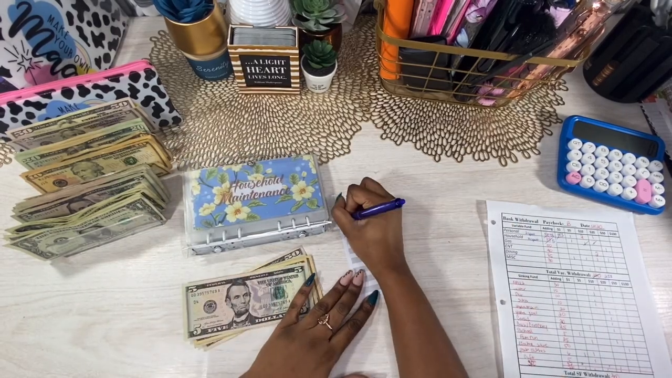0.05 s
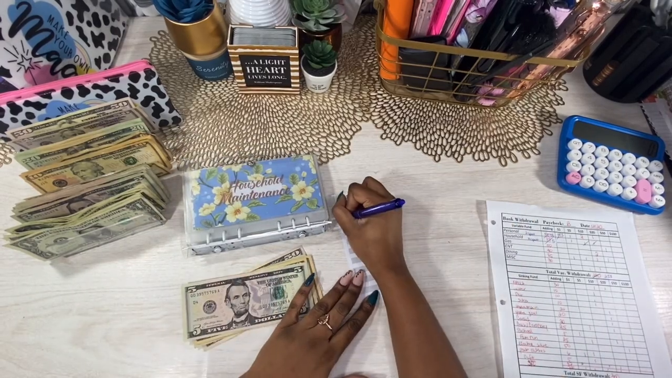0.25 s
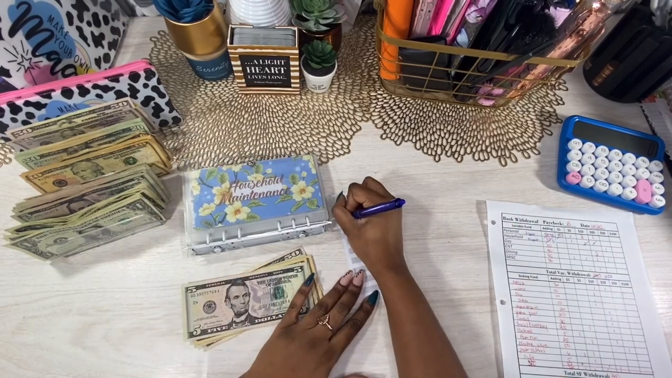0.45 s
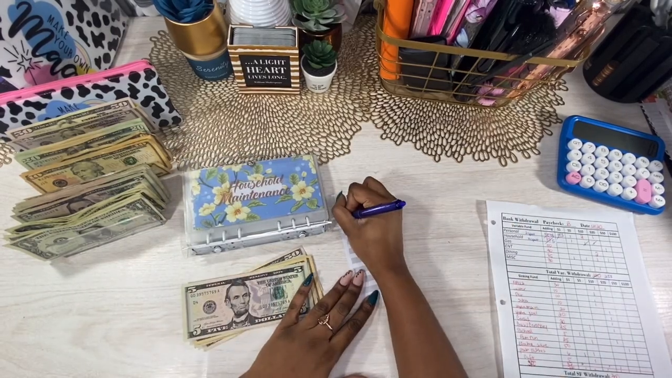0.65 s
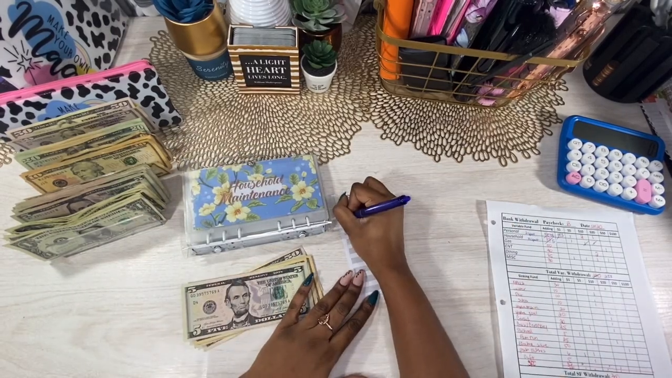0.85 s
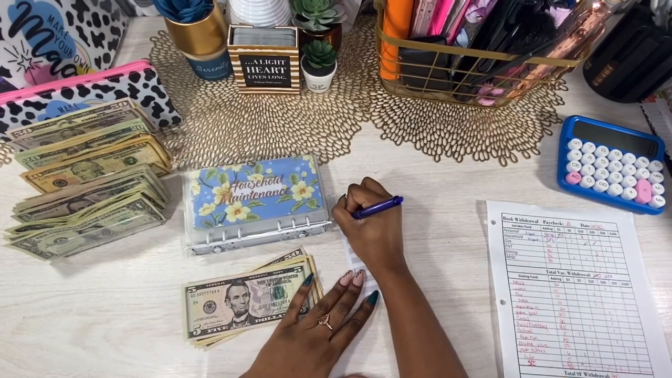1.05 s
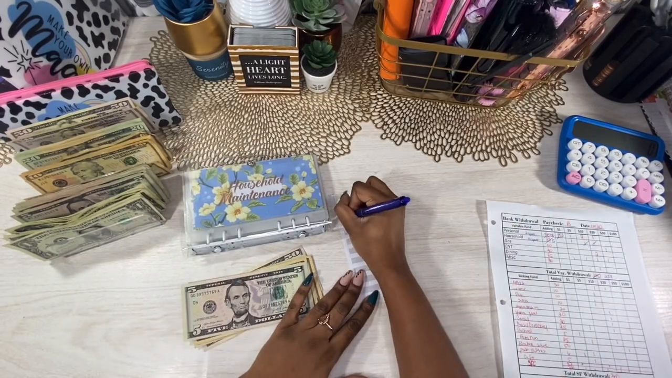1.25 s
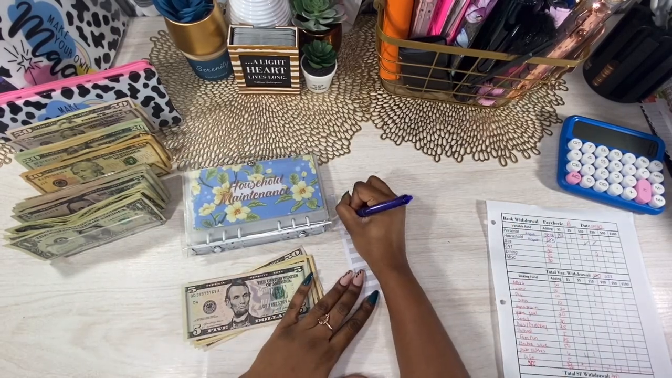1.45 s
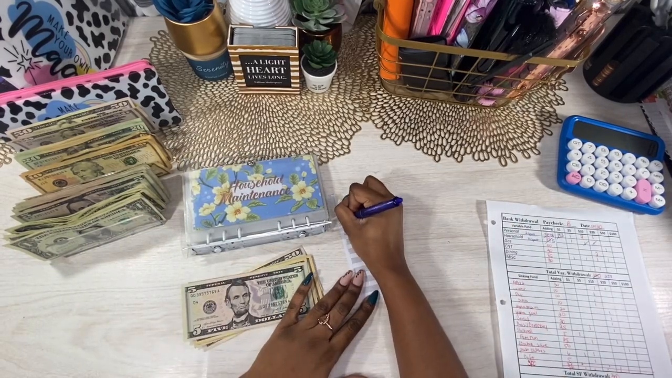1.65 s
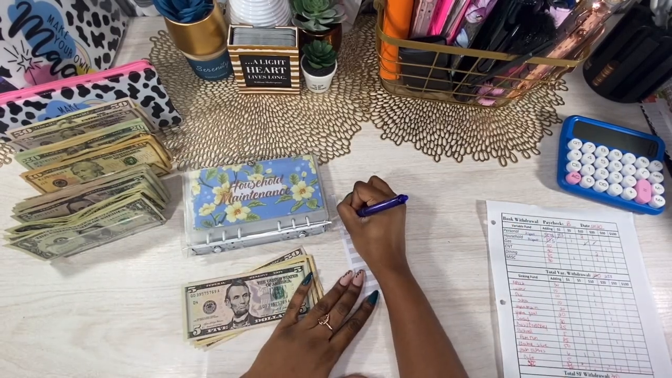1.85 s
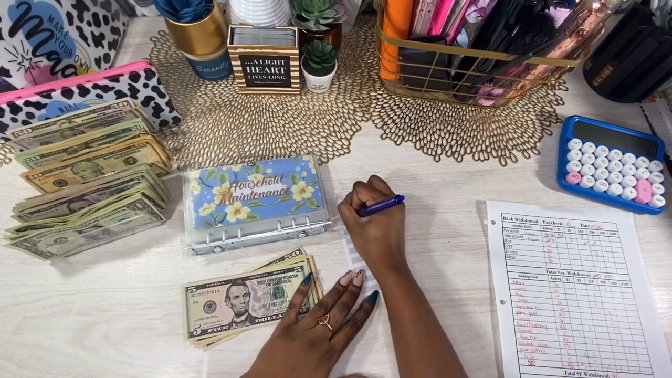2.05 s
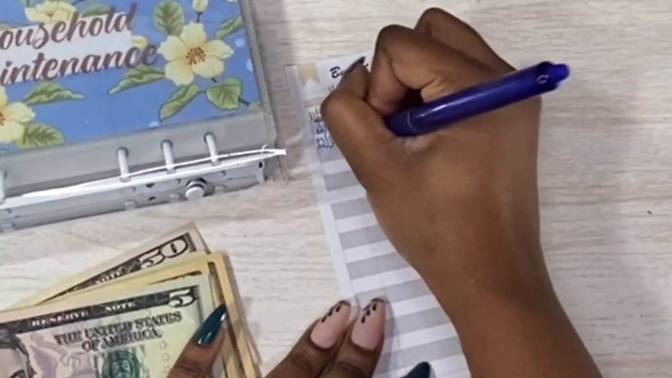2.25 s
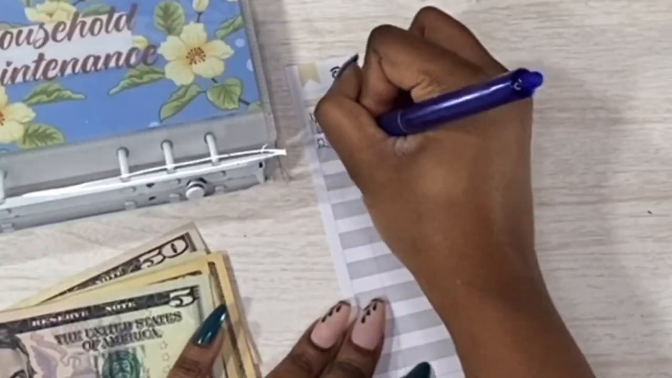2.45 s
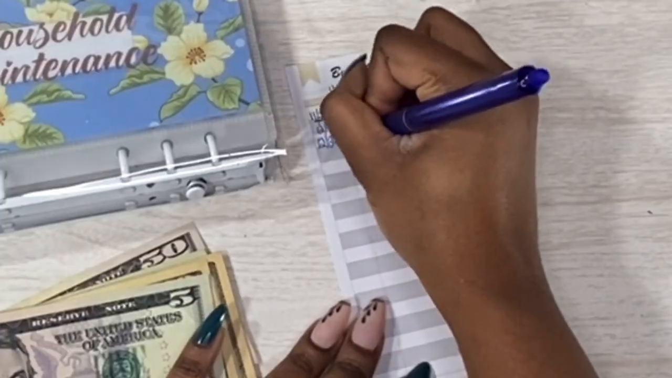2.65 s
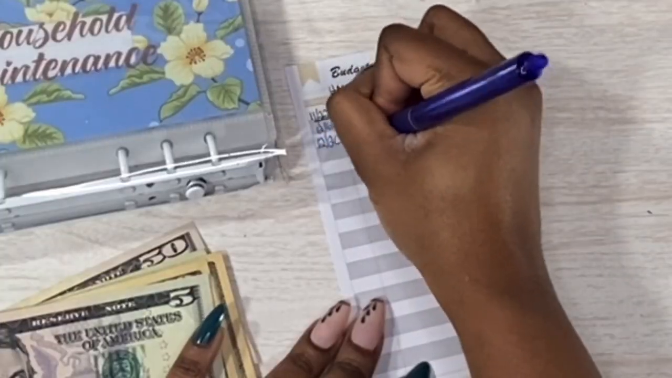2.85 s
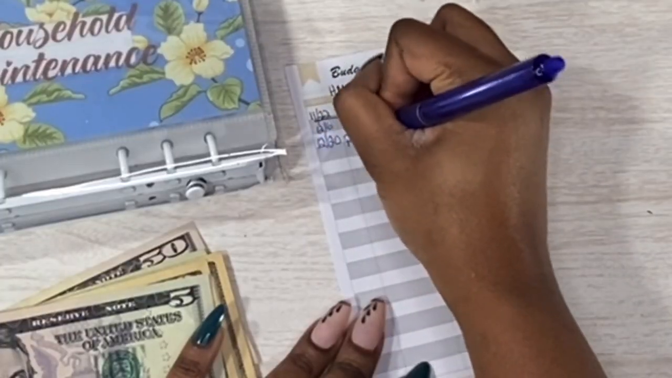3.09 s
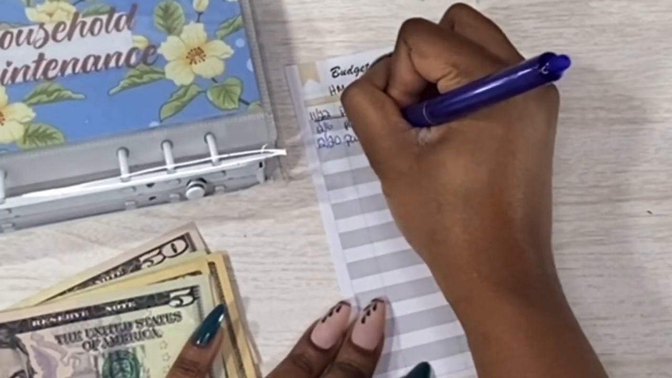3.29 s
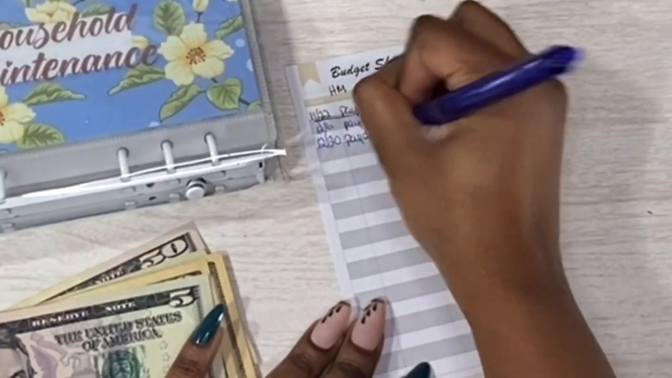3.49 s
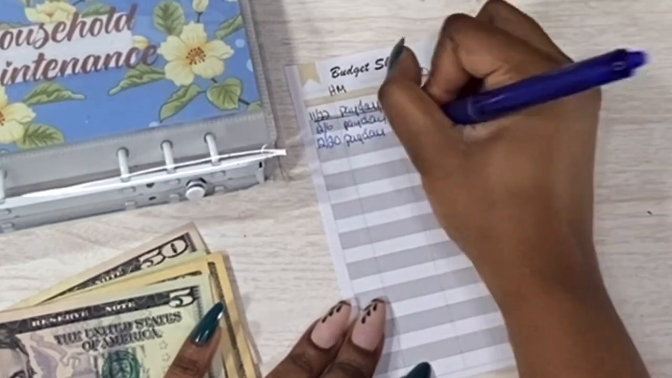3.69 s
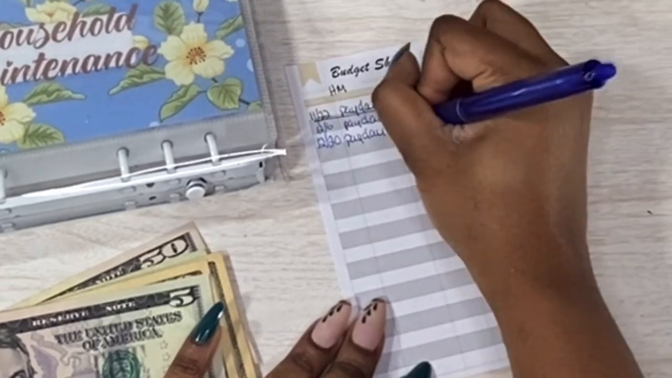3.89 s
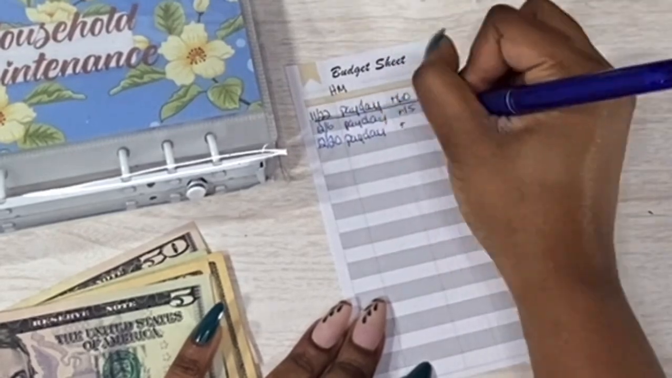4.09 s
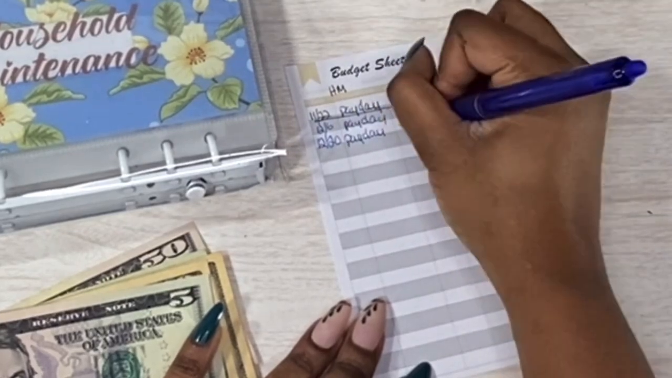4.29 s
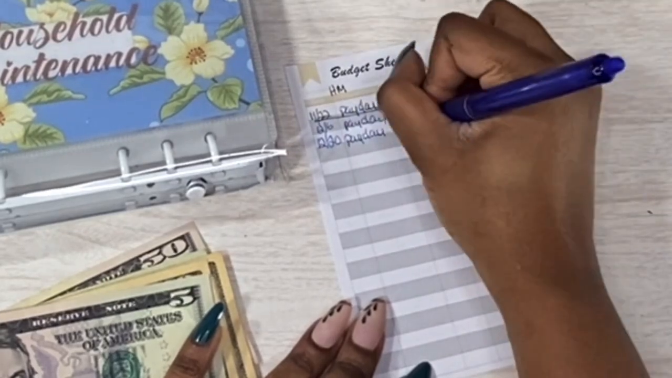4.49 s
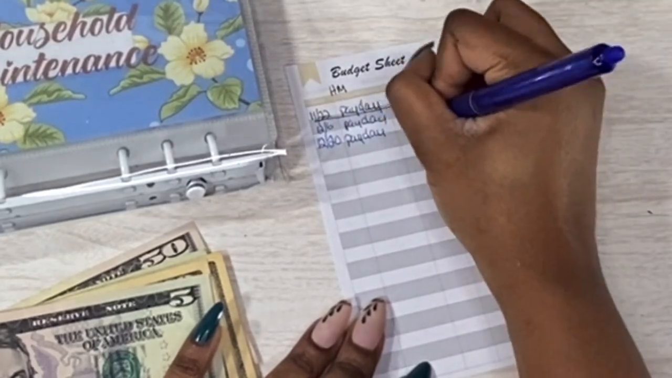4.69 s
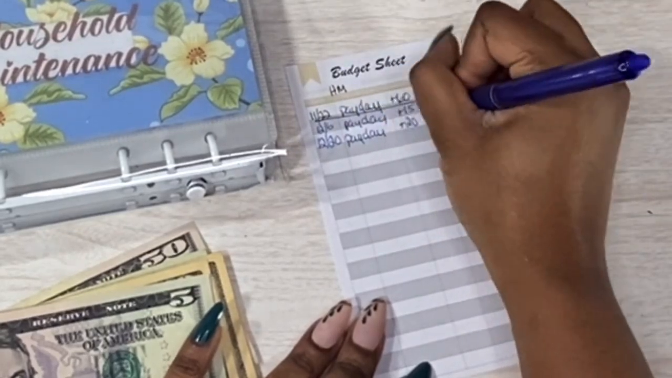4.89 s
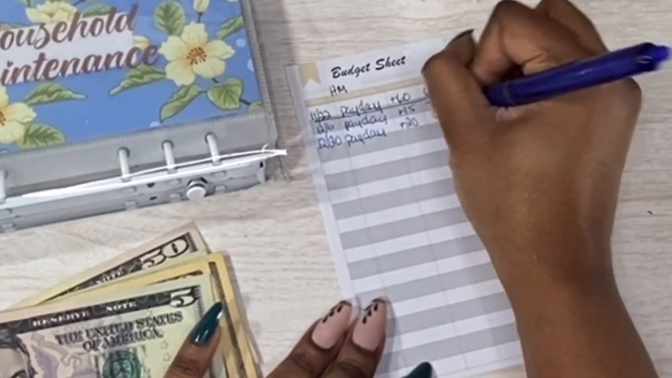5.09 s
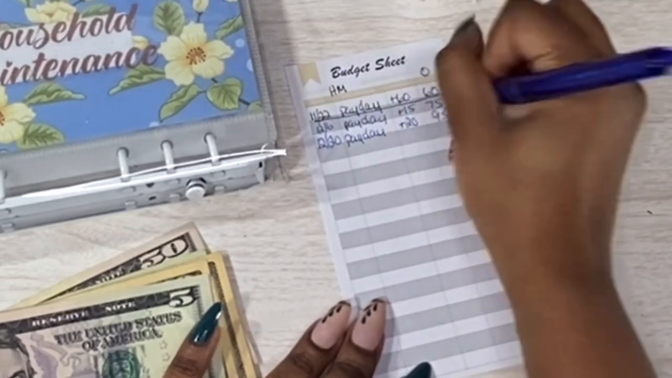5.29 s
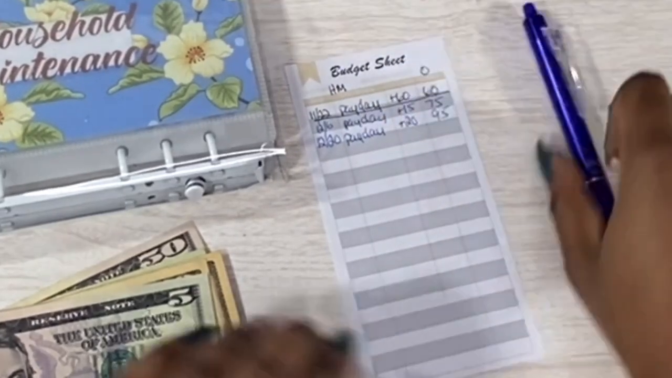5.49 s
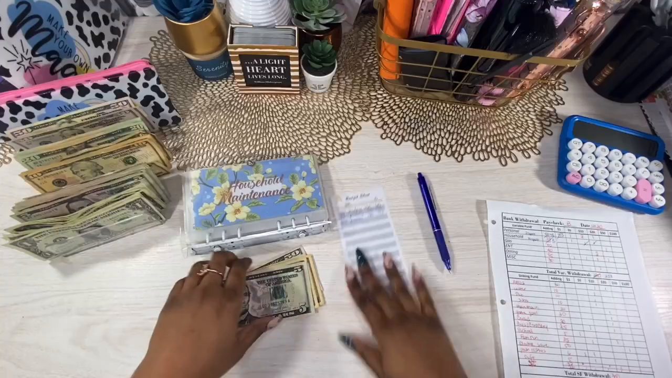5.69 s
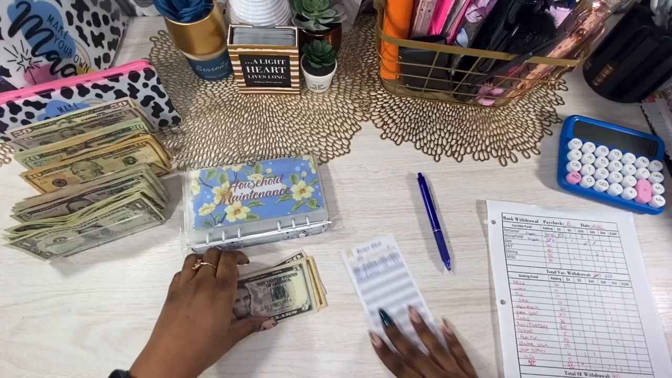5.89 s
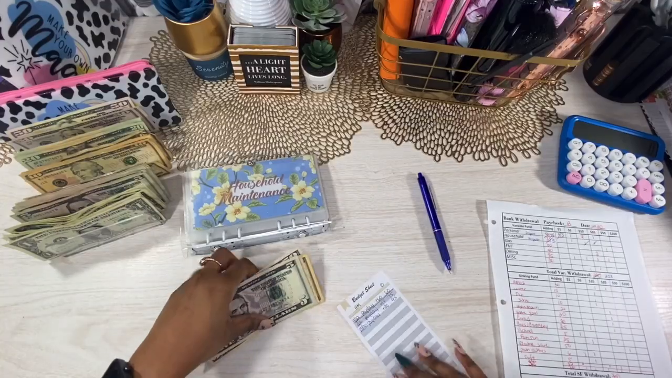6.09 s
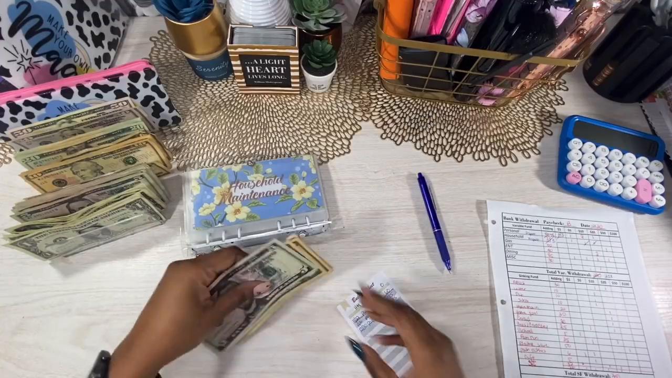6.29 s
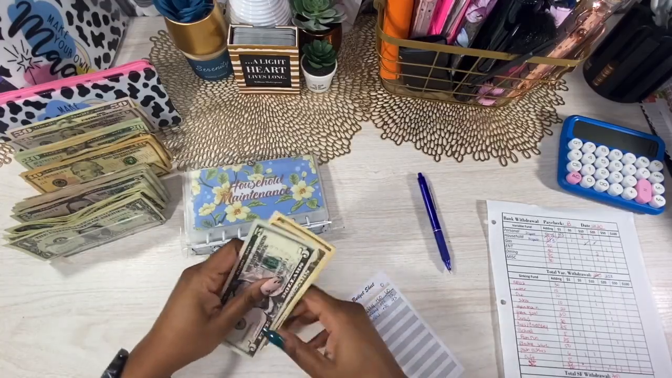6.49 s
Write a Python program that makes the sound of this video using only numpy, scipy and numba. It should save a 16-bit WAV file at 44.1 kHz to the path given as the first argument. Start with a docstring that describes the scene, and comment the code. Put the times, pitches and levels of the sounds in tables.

```python
"""At a hollow table in a quiet room, a ballpoint pen writes short strokes on a slip of paper.
The tip scratches over the paper fibres, taps down and makes the table top hum. The middle
stretch plays at nearly double speed, almost an octave up, and ends as the pen is dropped on
the table; then hands slide paper about. A car passes far outside."""
import sys
import numpy as np
from scipy import signal
from scipy.fft import rfft, irfft
from scipy.io import wavfile
from scipy.ndimage import uniform_filter1d
from numba import njit

SR = 44100
rng = np.random.default_rng(int(sys.argv[2]) if len(sys.argv) > 2 else 0)


def store_pcm(level_fs):
    """Save levels as 16-bit WAV."""
    pcm = np.round(np.clip(level_fs, -1, 1) * 32767).astype(np.int16)
    wavfile.write(sys.argv[1], SR, np.atleast_2d(pcm).T)


N = 288585

FAST_START_S, FAST_END_S, FAST_SPEED = 2.107, 5.555, 1.88
TABLE_LAG_S = .003  # the top starts to swing a moment after the contact
# In every table, dB values are relative and pitches are for normal speed.
# The low notes of the table top: pitch_hz, width_hz, level_db
TABLE_NOTES = [(56, 16, -2.5), (123, 4.37, 3.5), (168, 47, -12), (237, 22, -21.5), (338.3, 8.3, -21)]


def pen_scratch(speed):
    """The ball rolls over paper fibres, which hiss and make the pen and paper ring."""
    # Ringing of the pen barrel and paper under the ball: pitch_hz, width_hz, level_db
    rub_notes = [(260, 60, -6.5), (424, 180, -3), (1556, 170, -1.5), (1870, 370, -1.5)]
    # Broad hiss of the paper grain: pitch_hz, width_hz, level_db
    hiss_bands = [(4180, 1240, 6.5), (7360, 2100, -3), (10400, 1000, -16.5)]
    fibres = grit(spread_db=4, grains_per_s=1200)
    rub = flicker(3.8, .004) * resonate_twice(fibres, rub_notes, speed)
    hiss = flicker(3.1, .0042) * np.diff(resonate(fibres, hiss_bands, speed), prepend=0)
    scratch = rub + hiss
    fast = speed > 1
    scratch /= np.where(fast, np.std(scratch[fast]), np.std(scratch[~fast]))  # same level at both speeds
    return undb(4.5) * scratch_loudness(speed) * scratch


def scratch_loudness(speed):
    """Each stroke or slide rises quickly, holds a moment and is 25 dB down after its length."""
    # Pen strokes, and a hand sliding on the paper just before the pen drops: peak_s, length_s, level_db
    moves = [(0.749, 0.07, -59), (0.788, 0.1, -58.5), (0.97, .03, -70.5), (1.01, 0.12, -63),
             (1.055, 0.059, -70.5), (1.136, 0.053, -62.5), (1.2, 0.13, -77.5), (1.359, 0.11, -56),
             (1.391, 0.091, -58), (1.574, 0.08, -68), (1.661, 0.13, -58.5), (1.761, 0.042, -66.5),
             (1.844, 0.044, -73), (1.976, 0.082, -73.5), (2.088, 0.045, -58), (2.143, 0.14, -71),
             (2.363, 0.054, -59), (2.43, 0.049, -68), (2.478, 0.074, -70.5), (2.581, 0.073, -64),
             (2.679, 0.048, -62), (2.765, 0.065, -56.5), (2.838, .11, -71), (2.98, 0.056, -68.5),
             (3.093, 0.066, -64), (3.218, 0.074, -67), (3.399, 0.12, -73.5), (3.476, 0.17, -65),
             (3.902, 0.049, -68.5), (3.975, .12, -77.5), (4.551, 0.04, -76), (4.68, 0.053, -66.5),
             (4.742, 0.071, -69), (4.958, .05, -72), (5.026, 0.071, -64.5), (5.109, 0.053, -69),
             (5.187, 0.03, -72.5), (5.253, 0.11, -70.5), (5.35, 0.29, -62.5), (5.42, 0.028, -78)]
    t, gain, rise_s = np.arange(N) / SR, 0, .0121
    for peak_s, length_s, level_db in moves:
        age = t - peak_s
        rise = -age * speed[int(peak_s * SR)] / rise_s
        fall = (np.abs(age) / length_s) ** 1.395
        drop_db = 25 * np.minimum(np.where(age < 0, rise, fall), 10)
        gain = gain + undb(level_db - drop_db)
    return gain


def pen_taps(speed):
    """Paper cushions the landing tip: a light tick, a duller knock, and the table answers."""
    # The tip lands or flicks: start_s, tick_db, knock_db
    landings = [(0.747, -56, -67), (0.9115, -26, -43), (1.218, -58, -56), (1.303, -28, -43),
                (1.529, -24, -39.5), (1.85, -62, -67), (1.924, -55, -46.5), (2.1, -53, -50),
                (2.322, -50, -52.5), (2.411, -51, -39.5), (2.552, -64, -43.5), (2.678, -55, -43.5),
                (2.733, -62, -45.5), (2.846, -62, -55), (2.926, -56, -42.5), (3.055, -44, -48.5),
                (3.169, -51, -43.5), (3.353, -39.5, -51.5), (3.875, -58, -48), (3.965, -31.5, -40.5),
                (4.641, -29.5, -38.5), (5.103, -37, -36), (5.248, -23, -37.5)]
    start_s, tick_db, knock_db = np.transpose(landings)
    cushion = signal.butter(1, 2500, fs=SR)
    tick_hits, knock_hits = (
        signal.lfilter(*cushion, clatter(start_s, db, crack_s=.00075, rattle_s=.017, rattle_db=-28.5))
        for db in (tick_db, knock_db))
    tick = barrel_ring(np.diff(tick_hits, prepend=0), speed, damping=2.2)
    knock = barrel_ring(knock_hits, speed, damping=3.8)
    thud = resonate(blows(start_s + TABLE_LAG_S, knock_db, contact_s=.0034), TABLE_NOTES, speed)
    return undb(-20.5) * tick + undb(-17) * knock + undb(22.5) * thud


def pen_drop(speed):
    """The falling pen hits hard: its barrel rings, the contact cracks and the table thuds."""
    # The pen drops and bounces, fingernails touch down: start_s, hit_db, thud_db
    impacts = [(5.4581, -15, -14), (5.51, -3.5, -6.5), (5.533, -20.5, -28), (5.568, -28.5, -42),
               (5.692, -39, -22), (5.766, -40, -64), (6.488, -52, -67)]
    start_s, hit_db, thud_db = np.transpose(impacts)
    barrel_hits = clatter(start_s, hit_db, crack_s=.0018, rattle_s=.018, rattle_db=-17)
    barrel = barrel_ring(barrel_hits, speed, damping=2.6)
    crack = np.diff(clatter(start_s, hit_db, crack_s=.0018, rattle_s=.02, rattle_db=-17), prepend=0)
    thud = resonate(blows(start_s + TABLE_LAG_S, thud_db, contact_s=.00061), TABLE_NOTES, speed)
    return undb(-23.5) * barrel + undb(-16) * crack + undb(23.5) * thud


def barrel_ring(hits, speed, damping):
    """Hits make the pen barrel ring; damping, as from fingers on it, shortens the ring."""
    # Notes of the barrel: pitch_hz, level_db, ring_s (time to fade 60 dB, before damping)
    barrel_notes = [(292, -13.5, 0.16), (418, -8.5, 0.1), (558, -3.5, .12), (770, 2.5, 0.045),
                    (920, -10.5, 0.053), (1052, -13, 0.12), (1270, -3.5, 0.071), (1422, -18, 0.42),
                    (1580, 2.5, 0.018), (1933, 4, 0.037), (2267, -15.5, 0.19), (2985, -9, 0.054),
                    (4230, -20.5, 0.09)]
    sound = 0
    for pitch_hz, level_db, ring_s in barrel_notes:
        width_hz = damping * np.log(1000) / np.pi / ring_s
        sound = sound + undb(level_db) / width_hz * ring(hits, float(pitch_hz), width_hz, speed)
    return sound * SR / (2 * np.pi) / speed


def clatter(start_s, level_db, crack_s, rattle_s, rattle_db):
    """Each blow is a burst of tiny contacts: a quick crack and a slower loose rattle."""
    t = np.arange(SR // 4) / SR
    fade = np.exp(-t / crack_s) + undb(rattle_db) * np.exp(-t / rattle_s)
    burst = fade * (1 - np.exp(-t / .0021))
    hits = blows(start_s, level_db)
    before = np.arange(N) / SR < FAST_END_S
    early = signal.fftconvolve(hits * before, burst)[:N] * before  # cut where the fast stretch ends
    late = signal.fftconvolve(hits * ~before, burst)[:N]
    return (early + late) * grit(spread_db=4, grains_per_s=800)


def table_hum(speed):
    """The table top swings at its low notes while the hand drags on it."""
    drag = grit(spread_db=2.6, grains_per_s=150)
    swing = sum(undb(db) * steady(ring(drag, float(hz), float(width), speed))
                for hz, width, db in TABLE_NOTES)
    return push_loudness(speed) * unit(swing)


def push_loudness(speed):
    """Each push of pen or hand is one short swell of the hum, cut where the speed changes."""
    # Pushes on the table: start_s, peak_db
    pushes = [(0.66, -55.5), (0.742, -36), (0.782, -35), (0.914, -39), (0.95, -46), (1.008, -34),
              (1.07, -44.5), (1.14, -50.5), (1.215, -52), (1.3, -37), (1.345, -34.5), (1.39, -33),
              (1.525, -41.5), (1.585, -48), (1.655, -39), (1.7, -44.5), (1.76, -57), (1.84, -60.5),
              (1.93, -45), (1.99, -46), (2.07, -31.5), (2.108, -43), (2.327, -49.5), (2.366, -45.5),
              (2.415, -42), (2.435, -40), (2.473, -48.5), (2.512, -51), (2.577, -41.5), (2.633, -46),
              (2.682, -43), (2.767, -39.5), (2.811, -41), (2.847, -37), (2.932, -50), (2.982, -46.5),
              (3.082, -42.5), (3.106, -42), (3.175, -50), (3.214, -45.5), (3.246, -50), (3.323, -49),
              (3.407, -51), (3.468, -49.5), (3.492, -45), (3.606, -56), (3.713, -53.5), (3.851, -48.5),
              (3.901, -44.5), (3.971, -44), (4.019, -51), (4.101, -54.5), (4.364, -61), (4.42, -48.5),
              (4.497, -48), (4.517, -48.5), (4.558, -46), (4.604, -50.5), (4.649, -43.5), (4.684, -43),
              (4.742, -45), (4.771, -51.5), (4.883, -49), (4.926, -41.5), (4.967, -40.5), (5.03, -39),
              (5.109, -38), (5.162, -47.5), (5.19, -43), (5.254, -35.5), (5.296, -48), (5.376, -44),
              (5.557, -30), (5.605, -33), (5.702, -30), (5.79, -45), (5.84, -70), (5.9, -57), (6.03, -59),
              (6.15, -48), (6.2, -75.5), (6.37, -73), (6.515, -55.5)]
    start_s, peak_db = np.transpose(pushes)
    rise_s, bend = .02, .95  # a higher bend ends the swell more abruptly
    hit_power, power = blows(start_s, 2 * peak_db), 0  # doubling dB squares the gain
    stretch = np.cumsum(np.diff(speed, prepend=1) != 0)
    for index, rate in enumerate((1, FAST_SPEED, 1)):
        age = np.arange(SR // 2) / SR * rate / rise_s
        swell = age * np.exp((1 - age ** bend) / bend)
        inside = stretch == index
        power = power + signal.fftconvolve(hit_power * inside, swell ** 2 / 2)[:N] * inside
    return np.sqrt(np.abs(power))


def sliding_paper():
    """Sheets buckle in bursts and hiss as they slide."""
    # Loudness of the moving paper: time_s, buckle_db, hiss_db
    moves = [(5.555, -45, -46), (5.585, -49.5, -44.5), (5.677, -59.5, -63.5), (5.759, -67, -51),
             (5.767, -43, -54), (5.817, -60, -54.5), (5.86, -43.5, -54.5), (5.9, -47.5, -53),
             (5.94, -59.5, -55), (6.0, -48, -50), (6.06, -39.5, -59), (6.107, -58.5, -64.5),
             (6.16, -67, -54), (6.3, -70.5, -68.5), (6.478, -75, -76), (6.492, -59, -57.5),
             (6.54, -66, -67.5)]
    # Ringing of the sheet, then its hiss: pitch_hz, width_hz, level_db
    sheet_notes = [(465, 200, -8), (930, 590, 5.5), (1617, 700, -2)]
    hiss_bands = [(2870, 3460, -4.5), (6600, 6900, -6.5), (10970, 1400, -12), (14800, 1400, -17)]
    normal_speed = np.ones(N)
    buckle = unit(resonate_twice(grit(spread_db=1.4, grains_per_s=330), sheet_notes, normal_speed))
    hiss = unit(resonate(grit(spread_db=4.5, grains_per_s=2600), hiss_bands, normal_speed))
    buckle *= curve(moves) * flicker(2.1, .012)
    hiss *= curve(moves, column=2) * flicker(2, .012)
    return buckle + hiss


def reflections(sound, fade_s, low_hz):
    """Nearby objects send the treble back as a short wash of echoes."""
    t = np.arange(SR // 5) / SR
    tail = rng.standard_normal(len(t)) * 10 ** (-3 * t / fade_s) * (1 - np.exp(-t / .00016))
    echoes = signal.fftconvolve(sound, tail / np.linalg.norm(tail))[:N]
    return signal.lfilter(*signal.butter(2, low_hz, "high", fs=SR), echoes)


def distant_car(speed):
    """Tyres roar through the walls during the fast stretch, only loosely alike left and right."""
    # Loudness of the passing car: time_s, level_db
    passing = [(4.0, -87.5), (4.39, -76.5), (4.87, -63.5), (5.1, -70), (5.55, -64)]
    # Tyre roar: pitch_hz, width_hz, level_db
    tyre_bands = [(530, 150, -4), (990, 300, 1.5), (1260, 160, -4.5), (1700, 600, -8.5)]
    fast = speed > 1
    mid, side = (unit(resonate_twice(rng.standard_normal(N), tyre_bands, speed)[fast]) for _ in range(2))
    roar = np.zeros((2, N))
    roar[:, fast] = stereo(mid, undb(-2) * side)
    return curve(passing) * roar


def room_air():
    """Room air and microphone hiss; the bass is alike left and right."""
    # Strength of the background noise from low to high: pitch_hz, level_db
    air_colour = [(18, -11.5), (30, 16.5), (245, 0), (415, -8), (486, -9.5), (988, -18), (1100, -17),
                  (1320, -19), (7270, -29.5), (16000, -36)]
    pitch_hz, level_db = np.transpose(air_colour)
    hz = np.arange(N // 2 + 1) * SR / N + 1
    colour = undb(np.interp(np.log(hz), np.log(pitch_hz), level_db))
    side_gain = 1.7 * hz / (hz + 900)
    mid, side = (irfft(rfft(rng.standard_normal(N)) * colour * gain, N) for gain in (1, side_gain))
    return undb(-67) * unit(stereo(mid, side))


def microphone(sound, speed, low_hz):
    """The microphone drops the deep bass; the cut moves up with the playing speed."""
    slow, fast = (signal.sosfilt(signal.butter(4, low_hz * rate, "high", fs=SR, output="sos"), sound)
                  for rate in (1, FAST_SPEED))
    return np.where(speed > 1, fast, slow)


def grit(spread_db, grains_per_s):
    """Fibres catching: scattered grains of uneven size over smooth noise."""
    catches = rng.random(N) < grains_per_s / SR
    noise = rng.standard_normal(N)
    grain_db = np.minimum(spread_db * rng.exponential(size=N), 15)
    return noise * (1 + catches * undb(grain_db))


def flicker(depth_db, hold_s):
    """Contact pressure jumps as the paper grain passes, so the loudness flickers."""
    hold = int(hold_s * SR)
    steps = np.repeat(rng.standard_normal(N // 100), hold)[:N]
    return undb(depth_db * uniform_filter1d(steps, hold // 2 + 1))


def steady(swing, firmness=.48, window_s=.0126):
    """A rubbing contact keeps the swing up, so its loudness wavers less."""
    loudness = np.sqrt(uniform_filter1d(swing ** 2, int(window_s * SR)) + 1e-12)
    return unit(swing / loudness ** firmness)


def blows(start_s, peak_db, contact_s=0):
    """Short rounded pushes; with no contact time each is a single spike."""
    spikes = np.zeros(N)
    spikes[(np.asarray(start_s) * SR).astype(int)] = undb(peak_db)
    return signal.fftconvolve(spikes, np.hanning(int(contact_s * SR) + 3))[:N]


@njit
def ring(drive, pitch_hz, width_hz, speed):
    """One ringing note; it scales with the playing speed and is cut where the speed changes."""
    sound, swing, turn, loss = np.empty(len(drive)), 0j, 0j, 0.
    for i in range(len(drive)):
        if i == 0 or speed[i] != speed[i - 1]:
            swing, loss = 0j, 2 * np.pi * width_hz * speed[i] / SR
            turn = np.exp(2j * np.pi * min(pitch_hz * speed[i], .4 * SR) / SR - loss / 2)
        swing = swing * turn + loss * drive[i] + 1e-18
        sound[i] = swing.imag
    return sound


def resonate(drive, notes, speed):
    """One force makes all the notes of an object ring together."""
    return sum(undb(db) / np.sqrt(width) * ring(drive, float(hz), float(width), speed)
               for hz, width, db in notes)


def resonate_twice(drive, notes, speed):
    """Each note filters the force twice, so the gaps between the notes stay quiet."""
    sound = 0
    for hz, width, db in np.array(notes, float):
        once = ring(drive, hz, width, speed)
        sound = sound + undb(db) / np.sqrt(width) * ring(once, hz, width, speed)
    return sound


def curve(table, column=1):
    """Gain over time from a dB column, silent outside the table's times."""
    rows, t = np.array(table), np.arange(N) / SR
    inside = (t >= rows[0, 0]) & (t <= rows[-1, 0])
    return undb(np.interp(t, rows[:, 0], rows[:, column])) * inside


def undb(db):
    """Turn decibels into a gain."""
    return 10 ** (np.asarray(db) / 20)


def unit(sound):
    """Scale a sound to an average power of 1."""
    return sound / np.sqrt(np.mean(sound ** 2))


def stereo(mid, side):
    """Left and right share mid and get side with opposite signs."""
    return np.array([mid + side, mid - side])


def scene():
    """Pen, table and paper in the middle, with echoes, room air and the car around them."""
    t = np.arange(N) / SR
    speed = np.where((t > FAST_START_S) & (t < FAST_END_S), FAST_SPEED, 1.)
    mid = table_hum(speed) + pen_scratch(speed) + pen_taps(speed) + pen_drop(speed) + sliding_paper()
    from_change_s = np.minimum(np.abs(t - FAST_START_S), np.abs(t - FAST_END_S))
    mid *= np.minimum(from_change_s / .006, 1)  # the level dips briefly where the speed changes
    side = undb(-1) * reflections(mid, fade_s=.054, low_hz=900) - .04 * mid
    return microphone(stereo(mid, side) + room_air() + distant_car(speed), speed, low_hz=52.2)


def record(dry):
    """The phone cuts the treble above 15800 Hz."""
    return signal.sosfilt(signal.ellip(8, .2, 70, 15800, fs=SR, output="sos"), dry)


dry = scene()
out = record(dry)
store_pcm(out)
```